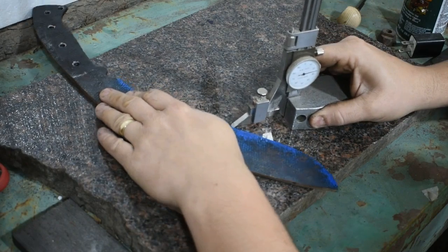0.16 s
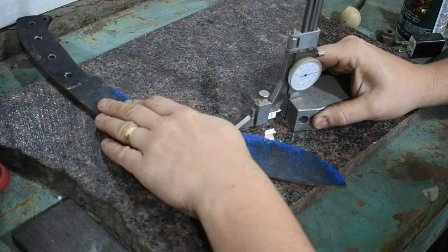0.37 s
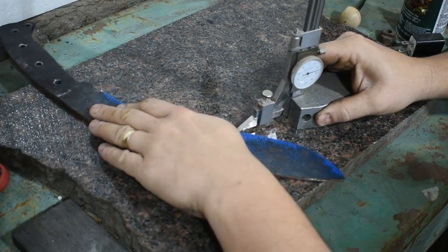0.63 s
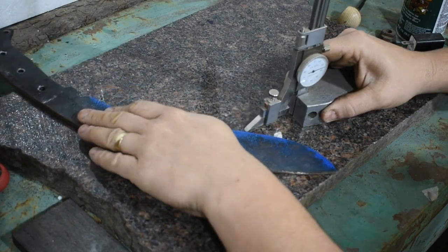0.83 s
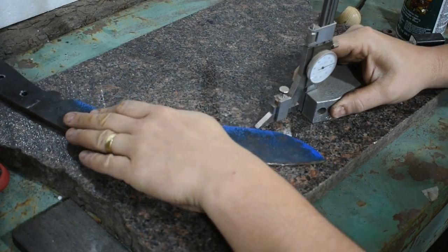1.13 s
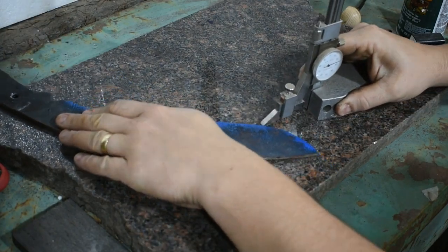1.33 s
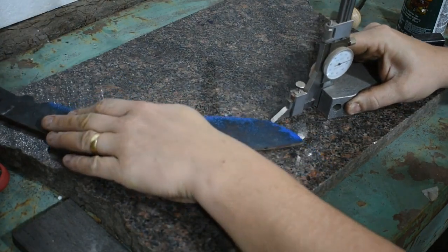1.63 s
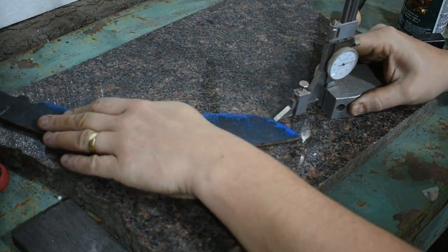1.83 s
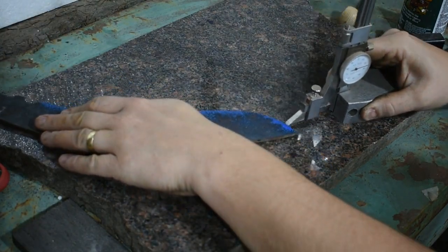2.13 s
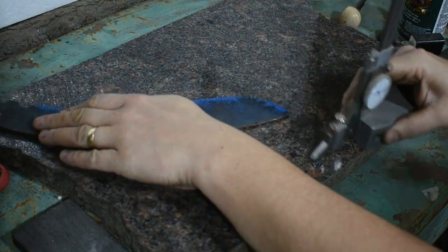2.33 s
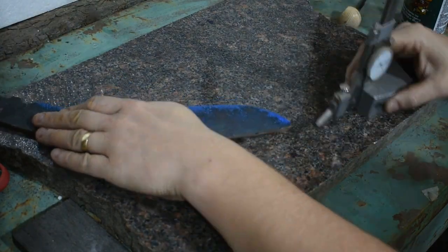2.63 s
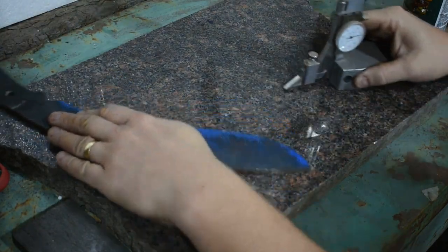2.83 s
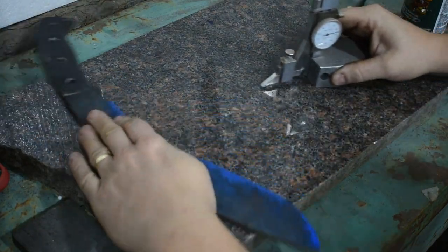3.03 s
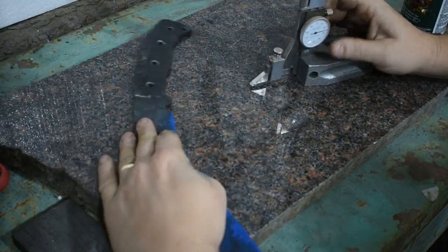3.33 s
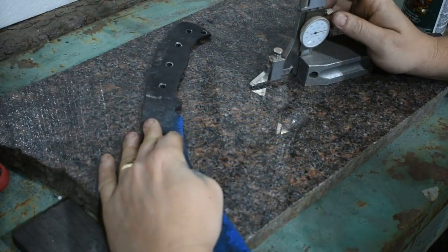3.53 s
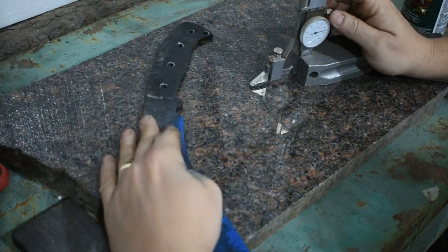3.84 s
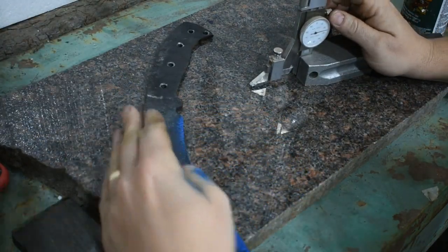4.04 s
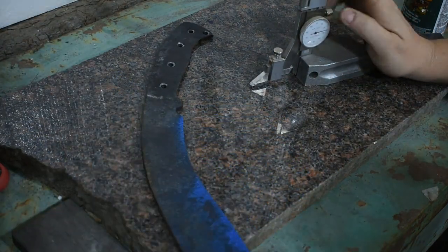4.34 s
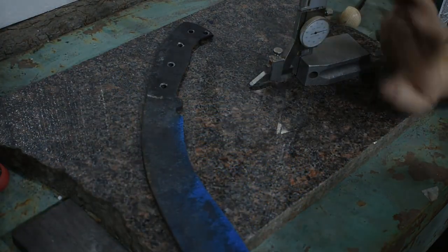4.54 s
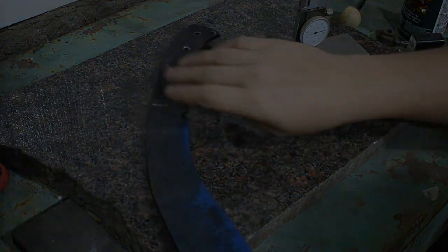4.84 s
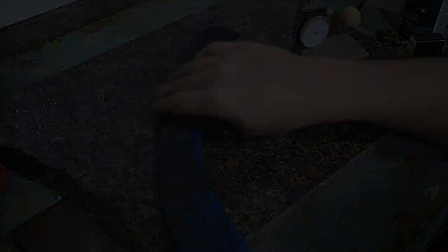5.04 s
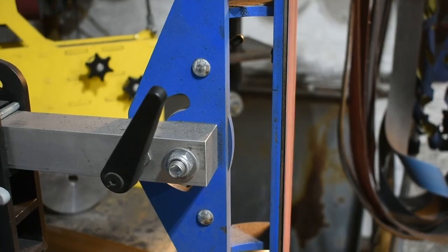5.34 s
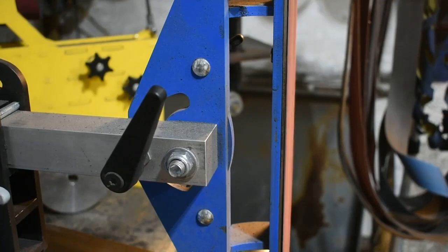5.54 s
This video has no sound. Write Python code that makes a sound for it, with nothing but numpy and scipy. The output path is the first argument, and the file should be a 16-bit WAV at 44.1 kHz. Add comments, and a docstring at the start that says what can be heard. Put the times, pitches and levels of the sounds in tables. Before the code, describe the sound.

Close by in a small workshop with a soft room hush, a steel blade blank is nudged twice over a granite plate, ringing thinly. From 0.5 seconds a metal scribe scrapes along the steel, ticking as it catches and growing louder. At about 2.2 seconds it judders off in a quick cluster of hard, ringing knocks, the loudest moment. A metal gauge then grates across the stone, its loose parts jingling, and is set down with bright clinks and knocks between 3 and 3.4 seconds. Soft bumps on the bench follow, with a hand brushing it around 4.5 seconds. Near 4.7 seconds the blank taps and rocks on the stone with a light ring. The bench sounds fade, and at about 5.3 seconds a running belt grinder cuts in, a steady abrasive hiss over motor hum and a high whine, until the end.

```python
"""Scribing steel on a granite plate

Close by in a small workshop, a steel blank is drawn along the scribe of a height gauge on a granite
surface plate; tiny slips make the steel and the stone ring. The scribe judders off the tip, the gauge is
pushed aside and set down with a jingle, the blank is turned and touched. The bench fades away and a cut
brings in a running belt grinder: abrasive hiss over motor hum and wheel whine."""
import sys
import numpy as np
from scipy import signal
from scipy.fft import rfft, irfft, next_fast_len
from scipy.io import wavfile
from scipy.ndimage import uniform_filter1d

SR = 44100
rng = np.random.default_rng(int(sys.argv[2]) if len(sys.argv) > 2 else 0)


def unload_wav(signal):
    """Save mono or channel-first audio to the path in sys.argv[1] as 16-bit WAV at rate SR, clipped to [-1, 1]."""
    wavfile.write(
        sys.argv[1],
        SR,
        np.round(np.clip(np.atleast_2d(signal).T, -1, 1) * 32767).astype(np.int16),
    )


N = 250488
CUT_S, FADE_S = 5.262, 0.2  # the cut to the grinder, and the bench's fade into it
TOP_HZ = 15850
GRIP_DB, GRIP_RATE = 1.7, 70  # the unsteady hand: depth, and random turns a second
SWELL_DB = 20  # the range a swell covers in its rise or fall time
CHATTER_DB, CHATTER_RISE_S, CHATTER_FALL_S = -30, 0.0075, 0.12  # the flare of rattle around each clink
BOOM_HZ, BOOM_T60_S, BOOM_ATTACK_S = 126.9, 1, 0.011  # the bench top's lowest mode

# Table levels are relative: each layer has its own fader. Mode widths are scaled by a damping factor.
# the workshop's decay: f/Hz, t60/s
WALL_DECAY = [(150, 1), (700, 0.32), (3000, 0.31), (12000, 0.18)]
# colour of the room tone: f/Hz, level/dB
AIR_SPECTRUM = [(15, -47), (25, -23), (75, -0.5), (331, -7), (389, -1.5), (684, -10), (1020, -5.5),
                (1800, -11), (2700, -10.5), (2920, -14.5), (4040, -15), (4620, -17.5), (15500, -27.5)]
# colour of the belt's hiss: f/Hz, level/dB
BELT_SPECTRUM = [(250, -36), (420, -14), (496, -17.5), (552, -22), (782, -3), (966, -8), (1390, -9),
                 (2630, -9), (3010, -7.5), (3900, -8.5), (8700, -4.5), (10700, -10), (11800, -2.5),
                 (15700, -5.5)]
# the grinder's motor hum: f/Hz, level/dB
MOTOR_TONES = [(360, -61.5), (479, -52.5), (511, -49.5), (600, -57.5), (711, -53.5), (822, -52.5),
               (1314, -52), (1437, -52), (1563, -59), (1717, -52), (1965, -52.5)]
# the whine of its belt and wheels: f/Hz, level/dB
WHINE_TONES = [(4339, -55), (4775, -52), (5642, -53), (7596, -55), (8032, -51), (8904, -49), (9771, -56),
               (10417, -56), (10853, -54), (11289, -48), (11585, -51), (11719, -46), (12155, -47),
               (12769, -54), (13921, -55), (14185, -55), (14540, -55), (14896, -55), (15251, -51),
               (15579, -53)]
# colour of gritty rubs and clicks: f/Hz, level/dB
GRIT_SPECTRUM = [(59, -48), (100, -9), (293, -13), (477, -9), (682, 0), (879, -13), (1690, -6), (2130, -21),
                 (2630, -15), (5170, -15.5), (6660, -20), (15500, -27)]
# colour of steel cracking against granite: f/Hz, level/dB
CRACK_SPECTRUM = [(240, -42.5), (400, -12), (1380, -10), (1660, 1.5), (2090, -7), (3680, -23.5),
                  (6480, -18), (6990, -19.5), (15500, -42)]
# colour of the point's scratch: f/Hz, level/dB
SCRATCH_SPECTRUM = [(71, -42.5), (120, -12.5), (395, -11), (484, -15), (668, -3.5), (1380, -24), (1660, 0),
                    (2030, -21.5), (3950, -17), (15000, -39)]

# the grinder's frame: f/Hz, width/Hz, level/dB
FRAME_MODES = [(515, 87, 10), (804, 236, 3), (1407, 132, 4), (1680, 48, -18), (1980, 34, -11)]
# the bench: f/Hz, width/Hz, level/dB
BENCH_MODES = [(163, 65, -5.5), (221, 49, -1), (395, 22, -5), (527.6, 34, -2), (690, 20, 0)]
# the blank lying loose: f/Hz, width/Hz, level/dB
LOOSE_BLANK_MODES = [(673, 38, 1.5), (1226, 46, -1), (1725, 150, -3), (2135, 40, -13), (2880, 82, -13),
                     (3260, 21, -12), (3640, 8, -2.5), (3900, 38, -12.5), (4560, 190, -10.5),
                     (4740, 41, -22), (5500, 96, -9.5), (6010, 47, -12), (6300, 48, -14), (6800, 54, -4),
                     (7400, 34, -18), (7640, 54, -10), (8600, 70, -12), (10130, 55, -17), (10800, 27, -17),
                     (11400, 82, -29), (12050, 37, -20), (12700, 38, -25), (13400, 40, -36),
                     (14100, 58, -31)]
# the blank held flat: f/Hz, width/Hz, level/dB
HELD_BLANK_MODES = [(1136, 16, -6), (1703, 28.5, 4), (2560, 97, -16), (3210, 130, -13.5),
                    (3890, 160, -15.5), (4890, 180, -10.5), (5500, 48, -16), (5970, 100, -9),
                    (7580, 65, -14), (8140, 77, -12.5), (8650, 42, -21), (8800, 43, -11),
                    (10300, 70, -15.5), (11260, 54, -15)]
# the height gauge: f/Hz, width/Hz, level/dB
GAUGE_MODES = [(727, 4.7, -6.5), (983, 47, -11), (1170, 28, -9), (1779, 59, 1), (2347, 40, -7.5),
               (2720, 50, -13.5), (2843, 20, -7), (3255, 33, -2.5), (3560, 47, -17), (3770, 18, -3.5),
               (4390, 47, -6), (4820, 61, -6.5), (5200, 89, -16), (5690, 78, -5.5), (6780, 42, 0),
               (7900, 49, -12), (7755, 40, 0), (8840, 58, -4), (9040, 17, -6.5), (9840, 72, -11.5),
               (9850, 44, -4.5), (11160, 47, -16.5), (11530, 25, -9.5), (12500, 120, -23),
               (12670, 42, -30.5), (13000, 35, -17), (13600, 67, -13), (14140, 59, -38), (14600, 48, -32.5),
               (14800, 56, -39.5)]
# the granite plate: f/Hz, width/Hz, level/dB
PLATE_MODES = [(269, 15, -20.5), (656, 16.2, 4), (1075, 29, -4.5), (1246, 36, 0), (1634, 58.5, 1),
               (1851, 110, -8.5), (2370, 150, -10), (3244, 310, -16.5), (3750, 99, -12.5), (3610, 37, -9),
               (4340, 28, -34)]
# the scribe arm on the blank: f/Hz, width/Hz, level/dB
SCRIBE_MODES = [(400, 5.9, -20.5), (674.6, 14, 0.5), (1136, 76, -8.5), (1654.4, 41.5, 6), (2386, 63, -17),
                (3939, 140, -5), (4750, 44, -18.5), (4980, 58, -9), (5730, 110, -13.5), (6100, 120, -14.5),
                (6700, 62, -18), (6930, 89, -20), (7650, 32, -26.5), (7820, 97, -20.5), (8360, 60, -22),
                (8940, 140, -20), (10160, 110, -20), (10770, 110, -20)]

# a hand brushing the bench: peak t/s, level/dB, rise/s, fall/s
BRUSH_SWELLS = [(4.415, -58, 0.044, 0.044), (4.505, -49, 0.014, 0.036), (4.535, -54.5, 0.015, 0.05),
                (4.65, -54.5, 0.21, 0.25)]
# hands and tools bumping the bench: t/s, level/dB, boom offset/dB, hardness/(dB per octave)
BENCH_BUMPS = [(0.004, -36.5, -17.5, 1.5), (2.837, -37.5, -15, -6), (3.207, -23.5, -21.5, 0.5),
               (3.874, -41.5, -2.5, -1), (4.399, -40.5, -18, -6.5), (4.517, -30, -34, 0.5),
               (4.529, -33, -23, -4.5)]
# the blank nudged twice toward the scribe: peak t/s, level/dB, rise/s, fall/s
NUDGE_SWELLS = [(0.21, -46.5, 0.35, 0.15), (0.345, -42, 0.28, 0.14)]
# the blank rocking on the stone: peak t/s, level/dB, rise/s, fall/s
ROCK_SWELLS = [(4.745, -46.5, 0.1, 0.076), (4.87, -50, 0.12, 0.16), (5.045, -51.5, 0.1, 0.11)]
# the blank tapping the stone: t/s, level/dB, judder/s
BLANK_TAPS = [(0.072, -34.5, 0.0023), (4.729, -21.5, 0.012), (4.75, -23.5, 0.016), (4.862, -30.5, 0.006)]
# the gauge jingling as it is carried back: peak t/s, level/dB, rise/s, fall/s
CARRY_SWELLS = [(3.19, -33.5, 0.81, 0.32)]
# the gauge's metal contacts: t/s, level/dB, judder/s
GAUGE_CLINKS = [(2.877, -25.5, 0.0045), (2.914, -21, 0.0019), (3.001, -10, 0.0044), (3.007, -15.5, 0.021),
                (3.027, -12, 0.0053), (3.201, -19, 0.0035), (3.2706, -28.5, 0.0028),
                (3.3647, -24.5, 0.0017), (3.4074, -30, 0.01), (3.4477, -29, 0.013)]
# the gauge's foot sliding on granite: t/s, rumble/dB, grit/dB
GAUGE_SLIDE = [(2.36, -37.5, -38.5), (2.474, -41.5, -66), (2.524, -34.5, -52.5), (2.59, -30, -46.5),
               (2.639, -41.5, -46.5), (2.78, -46, -37), (2.85, -34.5, -27), (2.948, -51.5, -40.5),
               (3.002, -40, -38)]
# heavy hits on the plate: t/s, level/dB, crack offset/dB, judder/s, hardness/(dB per octave)
PLATE_KNOCKS = [(2.105, -26, -25, 0.004, -4), (2.175, -11.5, -24.5, 0.0045, -3),
                (2.2499, -1, -22, 0.0094, 4), (2.258, -1, -17.5, 0.019, -4),
                (2.283, -1.5, -6.5, 0.0046, 2.5), (2.288, 1.5, -14.5, 0.0049, -1),
                (2.296, -4.5, -33.5, 0.0043, -3), (2.323, -12, -10.5, 0.0065, 0.5),
                (2.495, -31.5, -23.5, 0.0083, -7), (2.513, -13.5, -30.5, 0.007, -5.5),
                (2.568, -19.5, -20.5, 0.0083, 2.5), (3.012, -10.5, -16.5, 0.0049, 4.5),
                (3.213, -12.5, -11, 0.0063, 1.5), (3.281, -23.5, -17, 0.016, -1.5)]
# the point catching on the steel: t/s, level/dB, judder/s
POINT_CATCHES = [(0.4, -32, 0.003), (0.647, -30, 0.0052), (0.87, -26, 0.003), (1.274, -24.5, 0.0038),
                 (1.369, -23.5, 0.0033), (1.529, -34.5, 0.004), (1.746, -32.5, 0.0024)]
# the scribe's stroke: t/s, pressure/dB, bite/dB
SCRIBE_STROKE = [(0.5, -61, -58), (0.67, -41.5, -46), (0.9, -42, -46.5), (1.28, -45, -48), (1.42, -34, -42),
                 (1.57, -32.5, -41.5), (1.85, -48.5, -56.5), (2.03, -43, -55), (2.252, -26.5, -40.5)]


def amp(db):
    """Decibels to gain."""
    return np.exp(np.asarray(db) * (np.log(10) / 20))


def unit(x):
    """Scale to rms 1."""
    return x / np.sqrt(np.mean(x ** 2) + 1e-20)


def peaked(x):
    """Scale so that the loudest moment has rms 1."""
    return x / np.sqrt(uniform_filter1d(x * x, size=256).max() + 1e-20)


def add(track, s, sound):
    """Mix a sound into the track at time s."""
    start = max(round(s * SR), 0)
    track[start:start + len(sound)] += sound[:N - start]


def along(points, hz):
    """Join (frequency, value) points on a log axis."""
    freqs, values = np.transpose(points)
    return np.interp(np.log(hz + 1), np.log(freqs + 1), values)


def wobble(rate, size=N):
    """A random curve with rate turns a second."""
    knots = rng.standard_normal(int(size * rate / SR) + 2)
    return np.interp(np.arange(size) * rate / SR, np.arange(len(knots)), knots)


def gains(rows):
    """A fader curve for each dB column, from the first row to the last, with 5 ms fades."""
    times, *columns = np.transpose(rows)
    t = np.arange(round(times[0] * SR), round(times[-1] * SR)) / SR
    ends = np.clip(np.minimum(t - t[0], t[-1] - t) / .005, 0, 1)
    return [amp(np.interp(t, times, db)) * ends for db in columns]


def swells(moves):
    """A fader curve for movements that swell and die away evenly in dB."""
    t = np.arange(N) / SR
    power = np.zeros(N)
    for s, db, rise, fall in moves:
        away = np.maximum((s - t) / abs(rise), (t - s) / abs(fall))
        power += amp(db - SWELL_DB * np.minimum(away, 10)) ** 2
    return np.sqrt(power)


def played(gain, sound):
    """Loop or trim a sound to play under a fader curve."""
    return gain * np.resize(sound, len(gain))


def filtered(x, response):
    """Equalise x with a gain that is a function of frequency."""
    size = next_fast_len(len(x) + 4096, real=True)
    return irfft(rfft(x, size) * response(np.fft.rfftfreq(size, 1 / SR)), size)[:len(x)]


def coloured(x, spectrum):
    """x shaped by a spectrum, at rms 1."""
    return unit(filtered(x, lambda hz: amp(along(spectrum, hz))))


def halves(x, split_hz):
    """A crossover: the lows and highs of x, each at rms 1."""
    low = filtered(x, lambda hz: 1 / (1 + (hz / split_hz) ** 8))
    return unit(low), unit(x - low)


def rung(x, modes, damping, wander_db):
    """x through a body's resonances, at rms 1; each one swells and sinks as the contact point moves."""
    out = np.zeros(len(x))
    for k, (hz, width, db) in enumerate(modes):
        mode = signal.lfilter(*signal.iirpeak(hz, hz / (width * damping), SR), x)
        out += (-1) ** k * amp(db + wander_db * wobble(14.37, size=len(x))) * mode
    return unit(out)


def tilted(modes, hardness_db):
    """A harder contact favours the higher modes, by so many dB an octave."""
    return [(hz, width, db + hardness_db * np.log2(hz / modes[0][0])) for hz, width, db in modes]


def paired(modes, split, twin_db):
    """A loose part's modes come in close pairs, the twin slightly flat."""
    return modes + [(hz * (1 - split), width, db + twin_db) for hz, width, db in modes]


def friction(size, rate, spread_db, catch_db, catch_rate):
    """Tiny slips of random size, about rate a second, stronger where the surfaces catch."""
    slips = (rng.random(size) < rate / SR) * rng.choice([-1, 1], size)
    sizes_db = spread_db * np.clip(rng.standard_normal(size), -2, 2)
    return unit(slips * amp(sizes_db + catch_db * wobble(catch_rate, size=size)))


def blow(judder_s):
    """A contact's rebounds: a noise burst with time constant judder_s."""
    t = np.arange(SR // 4) / SR
    return rng.standard_normal(len(t)) * np.exp(-t / max(abs(judder_s), .001))


def steel_hits(contacts, modes, damping, click_db, detune):
    """Hard contacts: a click and the steel's ring, detuned a little by how it rests."""
    out = np.zeros(N)
    for s, db, judder in contacts:
        hit = blow(judder)
        resting = [(hz * (1 + detune * rng.standard_normal()), width, level) for hz, width, level in modes]
        ring = peaked(rung(hit, resting, damping, wander_db=8.5))
        click = peaked(coloured(hit, GRIT_SPECTRUM))
        add(out, s, amp(db) * (ring + amp(click_db) * click))
    return out


def tones(lines, t, flutter_db, drift_rad):
    """Machine tones that flutter in level and drift in phase."""
    out = np.zeros(len(t))
    for hz, db in lines:
        level = amp(db + flutter_db * wobble(25, size=len(t)))
        phase = 2 * np.pi * hz * t + drift_rad * wobble(30, size=len(t))
        out += level * np.sqrt(2) * np.sin(phase)
    return out


def room_tone():
    """The room's soft hush, fading out ahead of the cut."""
    fade = np.clip((CUT_S - np.arange(N) / SR) / 0.69, 0, 1) ** 1.2
    return amp(-56 + 1.3 * wobble(12)) * fade * coloured(rng.standard_normal(N), AIR_SPECTRUM)


def workshop(x, wet_db):
    """Nearby walls answer, the treble dying first."""
    hz, t, noise = signal.stft(rng.standard_normal(SR // 2), SR, nperseg=256)
    decay = amp(-60 * t / along(WALL_DECAY, hz)[:, None])
    tail = signal.istft(noise * decay, SR, nperseg=256)[1]
    tail = np.pad(tail / np.linalg.norm(tail), (SR // 200, 0))  # 5 ms pre-delay
    return x + amp(wet_db) * signal.fftconvolve(x, tail)[:N]


def grinder():
    """The abrasive belt hisses over the platen and shakes the frame; the motor hums, the wheels whine."""
    t = np.arange(N - round(CUT_S * SR)) / SR
    grains = friction(size=len(t), rate=20000, spread_db=3, catch_db=1, catch_rate=44)
    belt = amp(-31) * coloured(grains, BELT_SPECTRUM)
    frame = amp(-51.5) * rung(grains, FRAME_MODES, damping=0.56, wander_db=0.5)
    # the frame radiates little bass
    hiss = filtered(belt + frame, lambda hz: 1 / (1 + (420 / (hz + 1)) ** 10))
    rumble = amp(-72.5) * coloured(rng.standard_normal(len(t)), AIR_SPECTRUM)
    whine = amp(1) * tones(WHINE_TONES, t, flutter_db=5, drift_rad=0.83)
    hum = amp(-1.5) * tones(MOTOR_TONES, t, flutter_db=1, drift_rad=0.51)
    attack = 1 - np.exp(-t / 0.0026)
    return np.pad((hiss + rumble + whine + hum) * attack, (N - len(t), 0))


def hand_brush():
    """Skin hisses softly over the bench."""
    slips = friction(size=SR // 2, rate=9000, spread_db=1, catch_db=2.5, catch_rate=60)
    _, hiss = halves(coloured(slips, GRIT_SPECTRUM), split_hz=4500)
    return amp(-2) * played(swells(BRUSH_SWELLS), hiss)


def bench_bumps():
    """Soft blows thud on the bench, whose heavy top booms on."""
    out, t = np.zeros(N), np.arange(SR) / SR
    envelope = amp(-60 * t / BOOM_T60_S) * (1 - np.exp(-t / BOOM_ATTACK_S))
    boom = envelope * np.sin(2 * np.pi * BOOM_HZ * t)
    for s, db, boom_db, hardness in BENCH_BUMPS:
        thud = peaked(rung(blow(0.011), tilted(BENCH_MODES, hardness), damping=1, wander_db=2))
        add(out, s, amp(db - 8) * thud)
        add(out, s, amp(db + boom_db) * boom)
    return out


def blank_glide():
    """The blank, held flat, glides over the stone and rings thinly."""
    slips = friction(size=SR, rate=3000, spread_db=3, catch_db=2, catch_rate=90)
    ring = rung(slips, HELD_BLANK_MODES, damping=1, wander_db=2.5)
    grit = amp(-10.5) * coloured(slips, GRIT_SPECTRUM)
    return amp(1) * played(swells(NUDGE_SWELLS), ring + grit)


def blank_rocking():
    """The loose blank rocks on the stone: sparse small contacts keep it ringing."""
    slips = friction(size=SR, rate=550, spread_db=4, catch_db=3, catch_rate=26)
    modes = paired(tilted(LOOSE_BLANK_MODES, hardness_db=1.7), split=0.025, twin_db=-6.5)
    return played(swells(ROCK_SWELLS), rung(slips, modes, damping=0.28, wander_db=2.5))


def blank_taps():
    """The blank taps the stone and rings, lightly damped."""
    return amp(-13) * steel_hits(BLANK_TAPS, LOOSE_BLANK_MODES, damping=0.39, click_db=-8, detune=0.0057)


def gauge_chatter():
    """The gauge's loose parts jingle while it is carried, and flare up with each clink."""
    slips = friction(size=SR, rate=1500, spread_db=0.5, catch_db=1, catch_rate=76)
    flares = [(s, db + CHATTER_DB, CHATTER_RISE_S, CHATTER_FALL_S) for s, db, _ in GAUGE_CLINKS]
    modes = paired(tilted(GAUGE_MODES, hardness_db=0.5), split=0.03, twin_db=-5)
    ring = rung(slips, modes, damping=0.8, wander_db=8)
    return amp(-2) * played(swells(CARRY_SWELLS + flares), ring)


def gauge_clinks():
    """Metal meets metal and the gauge rings brightly."""
    modes = tilted(GAUGE_MODES, hardness_db=0.5)
    return amp(-9) * steel_hits(GAUGE_CLINKS, modes, damping=0.82, click_db=-8, detune=0.0089)


def gauge_slide():
    """The gauge's steel foot grates over the stone's grain; the plate and the gauge ring along."""
    rumble, grit = gains(GAUGE_SLIDE)
    slips = friction(size=SR, rate=6000, spread_db=3, catch_db=4.5, catch_rate=62)
    stone = rung(slips, PLATE_MODES, damping=0.96, wander_db=0.5)
    steel = rung(slips, GAUGE_MODES, damping=0.55, wander_db=4)
    low, high = halves(coloured(slips, GRIT_SPECTRUM) + amp(-4.5) * stone, split_hz=2000)
    # as the push ends the foot lightens and the gauge rings more freely
    free = np.linspace(0, 1, len(grit)) ** 2
    grate = played(grit * np.sqrt(1 - free), high)
    ring = played(grit * np.sqrt(free), steel)
    return amp(-1.5) * played(rumble, low) + amp(-2.5) * (grate + ring)


def plate_knocks():
    """Heavy steel judders on granite: the plate rings under a short crack, and the scribe arm sings on."""
    out = np.zeros(N)
    for s, db, crack_db, judder, hardness in PLATE_KNOCKS:
        ring = peaked(rung(blow(judder), tilted(PLATE_MODES, hardness), damping=1, wander_db=1.5))
        crack = amp(crack_db + 11.5) * peaked(coloured(blow(0.0089), CRACK_SPECTRUM))
        arm = rung(blow(judder), SCRIBE_MODES, damping=0.4, wander_db=2)
        _, arm_treble = halves(arm, split_hz=1500)
        add(out, s, amp(db - 11) * (ring + crack + amp(crack_db - 3.5) * peaked(arm_treble)))
    return out


def point_catches():
    """The point snags on the steel, ticking the scribe's upper modes."""
    modes = tilted(SCRIBE_MODES[4:], hardness_db=4)
    return amp(-14.5) * steel_hits(POINT_CATCHES, modes, damping=0.6, click_db=-9, detune=0.004)


def scribing():
    """The point ploughs the steel: its slips ring the scribe arm and the blank, and shake the bench."""
    pressure, bite = gains(SCRIBE_STROKE)
    grip = amp(GRIP_DB * wobble(GRIP_RATE, size=len(bite)))
    slips = friction(size=2 * SR, rate=7000, spread_db=4, catch_db=1.7, catch_rate=110)
    steel = rung(slips, SCRIBE_MODES, damping=0.88, wander_db=3.3)
    low, high = halves(steel + amp(-7.5) * coloured(slips, SCRATCH_SPECTRUM), split_hz=2880)
    scrape = amp(-2) * played(pressure, low) + amp(-0.5) * played(bite, high)
    # pressing harder couples the blank to the stone, whose main low mode joins in
    coupling = np.minimum(pressure / amp(-33), 1)
    stone = played(pressure * coupling, rung(slips, PLATE_MODES[1:2], damping=1.4, wander_db=0.4))
    shake = played(np.minimum(pressure, amp(-39)), rung(slips, BENCH_MODES, damping=0.6, wander_db=3.5))
    return grip * (scrape + amp(-8) * stone + amp(-13.5) * shake)


def scene():
    """The bench until the cut, then the grinder, in mono."""
    hits = gauge_clinks() + blank_taps() + point_catches()
    rubs = blank_glide() + gauge_chatter() + hand_brush() + blank_rocking()
    add(rubs, SCRIBE_STROKE[0][0], scribing())
    add(rubs, GAUGE_SLIDE[0][0], gauge_slide())
    bench = workshop(rubs + plate_knocks() + bench_bumps() + hits, wet_db=-8.5)
    # small parts radiate no deep bass
    bench = signal.sosfilt(signal.butter(2, 85, "highpass", fs=SR, output="sos"), bench)
    fade = np.clip((CUT_S - np.arange(N) / SR) / FADE_S, 0, 1)
    return (bench * fade + room_tone() + grinder())[None]


def record(dry):
    """Soft saturation rounds the loudest peaks, and a brick-wall low-pass trims the top."""
    rounded = dry[0] / (1 + np.abs(dry[0] / .95) ** 6) ** (1 / 6)
    return filtered(rounded, lambda hz: hz < TOP_HZ)[None]


dry = scene()
out = record(dry)
unload_wav(out)
```